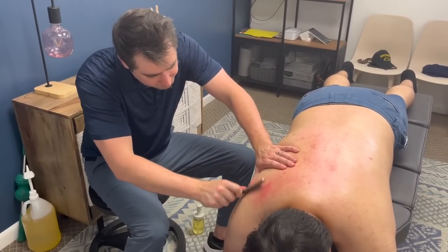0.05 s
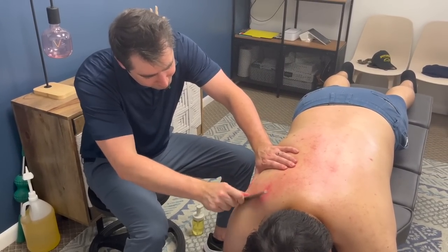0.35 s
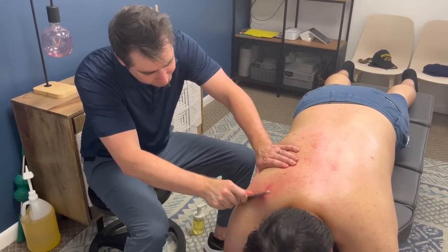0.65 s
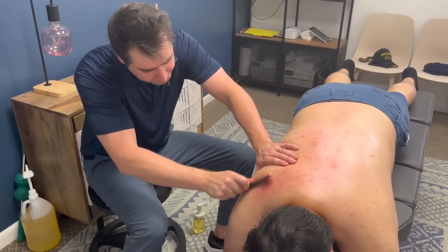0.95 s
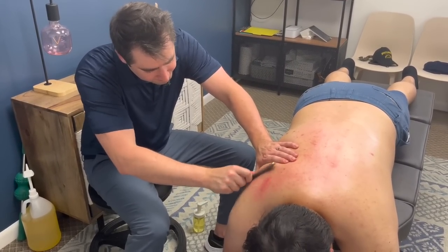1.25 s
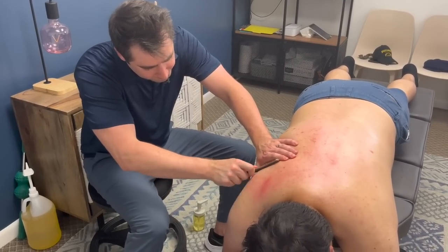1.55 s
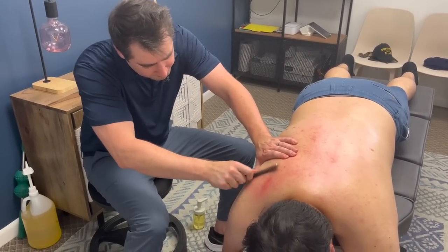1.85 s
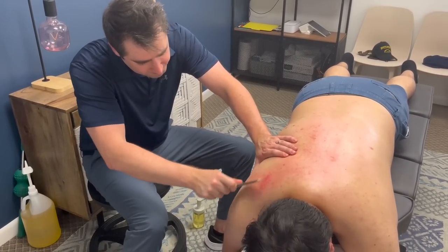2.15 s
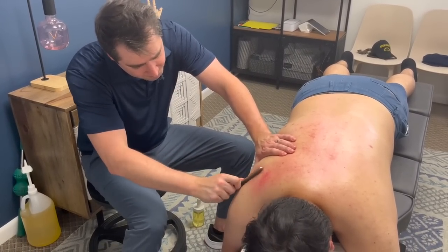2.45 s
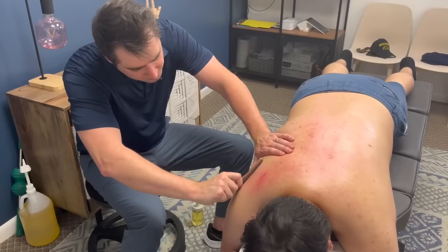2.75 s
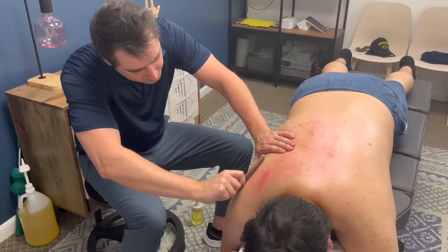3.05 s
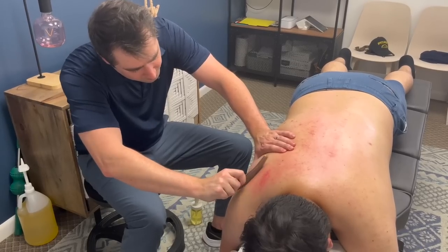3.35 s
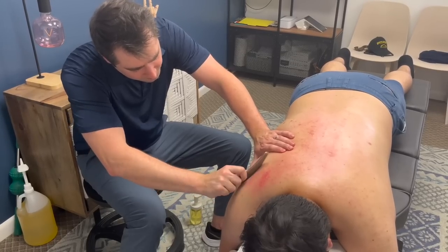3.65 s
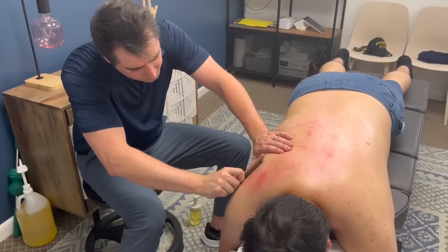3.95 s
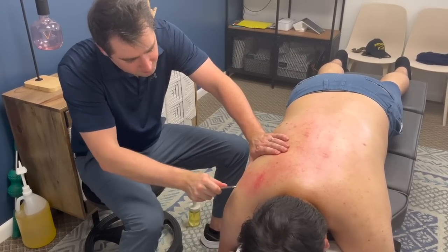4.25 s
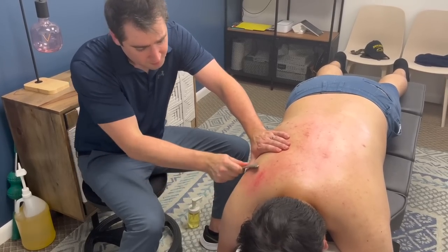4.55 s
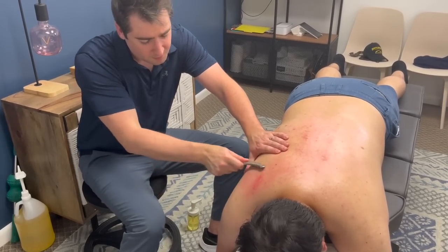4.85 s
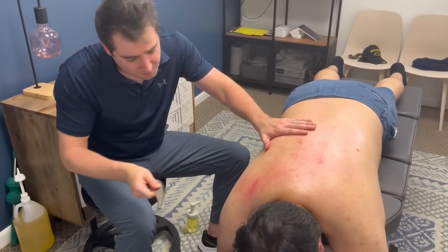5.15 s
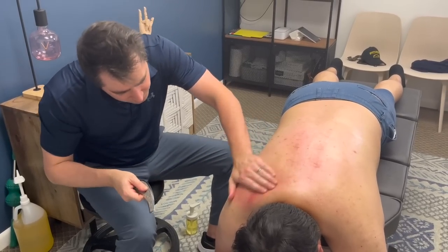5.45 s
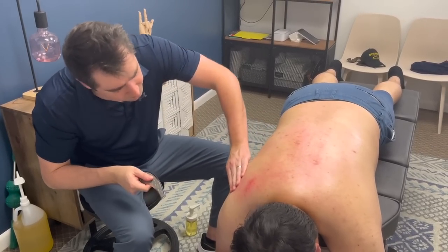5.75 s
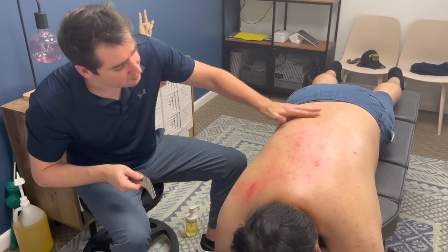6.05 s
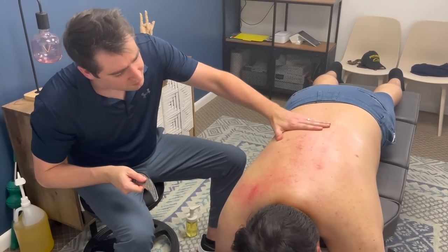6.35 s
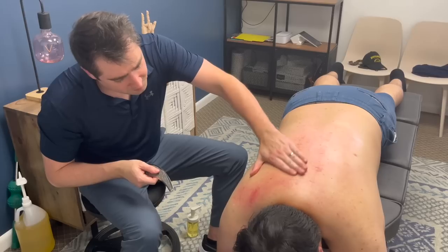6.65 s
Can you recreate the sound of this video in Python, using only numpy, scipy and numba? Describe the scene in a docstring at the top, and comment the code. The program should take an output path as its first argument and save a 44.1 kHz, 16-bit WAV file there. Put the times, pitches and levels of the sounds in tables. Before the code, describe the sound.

From the start, a steel scraper works softly over oiled skin at about four round trips a second, each push a grainy rasp, each return a brighter hiss, with a faint ring from the blade. Around 2 seconds the rhythm breaks, with a faint tick, then resumes from 2.7 to 3.9 seconds. A few slower strokes follow until 4.8 seconds, with a tool click at 4.3. Near 5 seconds comes a sharp metallic click with tiny finger squeaks and a rustle of clothes, then a softer tick. A palm slides over the back with a soft hiss from 5.1 to 5.7 seconds. The tool gives a quick, sharp cluster of clicks just before 6 seconds, and the palm slides again until about 6.7. Steady ventilation and a low electrical hum lie underneath throughout. The room is small, heard through a phone a metre or two away.

```python
"""In a small treatment room, a steel scraper rasps over oiled skin, about four round trips a second.
Skin grips and slips in many tiny jerks: the edge rasps, the flat face hisses and the blade rings.
Later the tool clicks and squeaks in the fingers, clothes rustle and the free palm slides over the back.
Ventilation and mains hum lie underneath; all is heard through a phone a metre or two away."""
import sys
import numpy as np
from scipy import signal
from scipy.fft import rfft, irfft
from scipy.io import wavfile
from scipy.ndimage import uniform_filter1d
from numba import njit

SR = 44100
rng = np.random.default_rng(int(sys.argv[2]) if len(sys.argv) > 2 else 0)


def file_out(sig):
    """Save sig as 16-bit WAV at sys.argv[1]."""
    # one column per channel
    cols = np.atleast_2d(sig).T
    # limit, then scale
    lim = np.clip(cols, -1, 1)
    pcm = np.round(lim * 32767).astype(np.int16)
    wavfile.write(sys.argv[1], SR, pcm)


N = 295029
T = np.arange(N) / SR
FREQS = np.maximum(np.fft.rfftfreq(N, 1 / SR), 1)

# Levels in the tables are relative: the functions add their own gains.
# pushes, edge first: (middle [s], length [s], rasp [dB], coarse bite [dB], blade ring [dB])
PUSH_STROKES = [(0.087, 0.099, -57.5, -58, -61), (0.344, 0.074, -57, -56, -57.5),
                (0.606, 0.077, -58, -63, -59), (0.859, 0.076, -54.5, -55, -55.5),
                (1.133, 0.076, -56, -57, -58), (1.383, 0.068, -58, -59.5, -67),
                (1.638, 0.071, -60, -61, -60), (1.894, 0.07, -59.5, -64, -63),
                (2.843, 0.077, -59.5, -63, -60), (3.102, 0.096, -59.5, -61, -61),
                (3.369, 0.082, -56, -65, -60), (3.627, 0.081, -57, -64, -61.5),
                (3.877, 0.16, -60.5, -73, -73), (4.66, 0.12, -56.5, -61.5, -64)]
# returns, flat face first: (middle [s], length [s], rasp [dB], hiss [dB], blade ring [dB])
RETURN_STROKES = [(0.212, 0.073, -56.5, -52.5, -66), (0.467, 0.078, -56.5, -51, -59.5),
                  (0.725, 0.076, -59, -54.5, -58.5), (0.988, 0.097, -55.5, -49, -59),
                  (1.255, 0.088, -56.5, -50.5, -61), (1.504, 0.077, -56, -50.5, -58.5),
                  (1.756, 0.067, -57.5, -50, -55.5), (2.004, 0.042, -55, -56.5, -70),
                  (2.431, 0.046, -58.5, -57.5, -65), (2.715, .06, -56, -55, -72),
                  (2.957, 0.072, -58, -51.5, -66), (3.22, 0.081, -58, -53.5, -65),
                  (3.491, 0.094, -58, -50, -56.5), (3.737, 0.073, -55, -51.5, -57.5),
                  (4.35, 0.097, -58, -56.5, -75), (4.502, .12, -61, -54, -70), (4.834, 0.13, -64, -67, -75)]
# tone colour of the dragging edge: (frequency [Hz], level [dB])
EDGE_COLOUR = [(300, -2.5), (900, -2), (1600, -10.5), (2100, -3.5), (2700, -4.5), (3300, -2), (3900, -0.5),
               (4600, -2), (5000, -3.5), (5400, -3.5), (6200, -9), (11500, -16.5)]
# tone colour of the gliding face: (frequency [Hz], level [dB])
FACE_COLOUR = [(500, -30), (2800, -22), (4400, -10.5), (5200, -12), (6200, -14), (7100, -4.5), (8200, -2),
               (9500, 0), (11000, 2), (12000, 0)]
# notes the blade rings at while it scrapes: (frequency [Hz], level [dB])
BLADE_NOTES = [(3340, 4), (4400, -7), (5380, -11)]
# the tool clicking in the hand: (time [s], ring [dB], dull knock [dB], treble limit [Hz], snap [dB])
TOOL_CLICKS = [(2.197, -63, -54, 6000, -70), (4.3283, -42, -37.5, 8000, -41), (4.3312, -45, -46, 7000, -55),
               (4.9572, -45, -50, 6000, -55), (4.9583, -35, -43, 5960, -21.5),
               (5.2012, -52, -43.5, 4000, -45), (5.9505, -40, -45, 9000, -44),
               (5.9555, -38.5, -47, 9000, -29), (5.9609, -32, -42.5, 9400, -38),
               (5.9643, -34, -49, 7000, -38)]
# notes of the tool, damped by the fingers: (frequency [Hz], level [dB], time to fade by 60 dB [s])
TOOL_NOTES = [(1120, -29, 0.01), (2250, -4, 0.003), (3380, 0.5, 0.0071), (4500, 1.5, 0.0078),
              (5670, -2.5, 0.0094), (6700, -8, 0.015), (8140, -21, 0.12), (9730, -3, 0.032)]
# tone colour of a knock on flesh: (frequency [Hz], level [dB])
KNOCK_COLOUR = [(150, -18), (450, 1.5), (750, -3), (1150, -1), (1600, -9), (2300, -5), (3500, -7),
                (9000, -42)]
# oily fingers squeaking on steel: (middle [s], length [s], pitch [Hz], glide [Hz/s], level [dB])
FINGER_SQUEAKS = [(4.823, .002, 4800, 0, -46.5), (4.953, .007, 4700, 0, -54),
                  (4.968, 0.014, 4930, 90000, -50), (4.982, 0.024, 7140, 30000, -55)]
# slides of the palm: (touches [s], lies flat [s], lifts [s], level [dB])
PALM_SLIDES = [(5.065, 5.287, 5.73, -52), (6.05, 6.52, 6.69, -50)]
# strength of the palm's hiss, one curve for each slide: (time [s], level [dB])
PALM_HISS_CURVES = [
    [(5.05, -74), (5.098, -66), (5.366, -47.5), (5.544, -55), (5.678, -48), (5.752, -71), (5.78, -69)],
    [(6.03, -65), (6.528, -59), (6.69, -59.5)],
]
# tone colour of the palm's hiss: (frequency [Hz], level [dB])
PALM_HISS_COLOUR = [(500, -30), (3000, -16), (5200, -7), (6200, -8), (7100, -3.5), (9500, 4.5), (11500, -6)]
# tone colour of the palm's rub: (frequency [Hz], level [dB])
PALM_RUB_COLOUR = [(150, -3), (320, 7.5), (700, 2), (1200, 2), (1800, 0.5), (3500, 3), (5500, -2.5),
                   (6500, -1), (11000, -10.5)]
# hollow rubs of a sleeve or cupped hand: (middle [s], length [s], pitch [Hz], level [dB])
HOLLOW_RUBS = [(4.25, 0.98, 2120, -68), (5.34, 0.092, 3000, -58), (5.693, 0.73, 2180, -57),
               (6.603, 0.17, 1190, -56.5), (6.62, 0.16, 3500, -65), (6.596, 0.43, 297, -55)]
# dull rustles of hands and clothes: (middle [s], length [s], level [dB])
RUSTLES = [(.01, 0.13, -54.5), (2.616, 0.18, -58), (3.91, 0.26, -60), (4.068, 0.1, -58.5),
           (4.37, 0.14, -60), (4.849, 0.055, -48.5), (4.908, 0.062, -53.5), (5.604, 0.97, -53)]
# tone colour of those rustles: (frequency [Hz], level [dB])
RUSTLE_COLOUR = [(150, 0), (400, 0.5), (1100, -1.5), (1700, -5), (2800, -7.5), (4500, -10), (7000, -15),
                 (11000, -12)]
# how far the left side runs ahead for sound from the table: (frequency [Hz], phase lead [rad])
LEFT_LEAD = [(100, 2), (2200, -0.25), (4500, 1), (6400, 0.85), (8100, 0.58), (9100, 2), (9900, 2.5),
             (11000, 3.5)]
# tone colour of the ventilation: (frequency [Hz], level [dB])
AIR_COLOUR = [(8, -61.5), (20, -56), (36, -57), (43, -49.5), (53, -61.5), (66, -64.5), (85, -65),
              (102, -72.5), (128, -67), (160, -79.5), (215, -75), (280, -78.5), (400, -83), (1000, -91.5),
              (2500, -98), (6000, -100.5), (7600, -101.5), (9800, -99.5), (11500, -102.5)]
# balance of the air noise, with more bass on the right: (frequency [Hz], left minus right [dB])
AIR_PAN = [(20, -3.5), (45, -2.5), (75, -1.5), (130, -1.5), (200, -0.5), (1000, 1), (6000, 0)]
# how alike the air noise is on the two sides: (frequency [Hz], correlation [-1 to 1])
AIR_SIMILARITY = [(30, 0.9), (100, 0.15), (200, 0.48), (600, 0.6), (1200, 0.17), (6000, 0.62),
                  (11000, -0.56)]
# tones of the mains and the fan: (frequency [Hz], left [dB], right [dB], phase lead of left [rad])
HUM_TONES = [(59.5, -44, -33, -2), (75, -59, -54.5, 0), (83.2, -65, -51, -0.9), (120, -66, -62, -1.2),
             (241, -66, -62.5, -0.5), (271.7, -66, -65, 0.6), (486, -70, -67, 1.5), (601, -79, -68.5, 0),
             (832, -72.5, -85, -0.35)]
# slow rise and fall of the hum: (time [s], level [dB])
HUM_CURVE = [(0.2, 1), (1.6, 0), (2.9, 0.5), (3.6, -1.5), (4.5, -1), (5.3, 4), (6.1, 1.7), (6.6, 0.7)]

TOP_HZ = 11850  # upper limit of the treble


def scraper():
    """The edge rasps on the skin and sets the blade ringing; the flat face adds a bright hiss."""
    tight_q, loose_q, loosen_s = 6.1, 15, 2.2  # a looser grip gives a purer ring (higher Q)
    drag, bite, glide, sing = strokes()
    slips = friction(slips_per_s=3000, spread_db=-1.0, grip_db=1.5, grip_hz=140)
    shift = 1 + 0.016 * wander(5.1)  # finger pressure bends the notes
    tight, loose = (
        unit(sum(undb(db) * resonance(slips, hz * shift, hz / q) for hz, db in BLADE_NOTES))
        for q in (tight_q, loose_q))
    ring = sing * np.where(T < loosen_s, tight, loose)
    # a hard push catches the skin in coarser, lower slips
    catches = friction(slips_per_s=1500, spread_db=1.0, grip_db=2.0, grip_hz=370)
    catches = resonance(catches, hz=2400 * (1 + 0.06 * wander(6.8)), width_hz=2400.0)
    grit = bite * unit(resonance(catches, hz=np.full(N, 2400.0), width_hz=2800.0))
    face_slips = friction(slips_per_s=13000, spread_db=0.0, grip_db=1.85, grip_hz=130)
    edge_slips = friction(slips_per_s=2200, spread_db=1.0, grip_db=1.5, grip_hz=140)
    hiss = colour(glide * face_slips, FACE_COLOUR)
    rasp = colour(drag * edge_slips, EDGE_COLOUR)
    return undb(1.0) * rasp + undb(1.5) * ring + undb(2.0) * grit + undb(4.0) * hiss


def strokes():
    """Each stroke's speed sets how much the edge drags and bites, the face glides and the blade sings."""
    drag, bite, glide, sing = np.zeros((4, N))
    for time, length, rasp_db, bite_db, ring_db in PUSH_STROKES:
        speed = swell(time, length, shape=3.4)
        drag += undb(rasp_db) * speed
        bite += undb(bite_db) * speed ** 2
        glide += undb(rasp_db - 0.5) * speed
        sing += undb(ring_db) * speed ** 2
    for time, length, rasp_db, hiss_db, ring_db in RETURN_STROKES:
        speed = swell(time, length, shape=2.7)
        drag += undb(rasp_db) * speed
        glide += undb(hiss_db) * speed
        sing += undb(ring_db) * speed ** 2
    return drag, bite, glide, sing


def clicks():
    """Steel snaps on a fingernail, cracks, rings until the fingers stop it and knocks dully on flesh."""
    snap_rise_s, thud_rise_s = 0.000035, 0.00019
    bright, dull = np.zeros((2, N))
    t = T[:SR // 10]
    for time, ring_db, knock_db, treble_hz, snap_db in TOOL_CLICKS:
        span = slice(int(time * SR), int(time * SR) + len(t))
        crack = rng.standard_normal(len(t)) * np.exp(-t / 0.0026)
        knock = rng.standard_normal(len(t)) * np.exp(-t / 0.0036)
        detune = 1 + 0.012 * rng.standard_normal(len(TOOL_NOTES))
        ring = sum((-1) ** k * undb(db - 60 * t / fade_s) * np.sin(2 * np.pi * hz * detune[k] * t)
                   for k, (hz, db, fade_s) in enumerate(TOOL_NOTES))
        soften = signal.butter(4, treble_hz, fs=SR)
        snap = t / snap_rise_s * np.exp(1 - t / snap_rise_s)
        thud = t / thud_rise_s * np.exp(1 - t / thud_rise_s)
        bright[span] += undb(ring_db) * signal.lfilter(*soften, undb(-2.0) * ring + undb(0.5) * crack)
        bright[span] += undb(snap_db) * snap
        dull[span] += undb(knock_db) * (thud / 2 + undb(-2.5) * knock)
    return bright + colour(dull, KNOCK_COLOUR)


def squeaks():
    """A fingertip sticks and slips for an instant; the longer squeaks rise in pitch as it slides off."""
    out = np.zeros(N)
    for time, length, hz, glide, db in FINGER_SQUEAKS:
        pitch = hz + glide * np.clip(T - time, -length, length)
        tone = unit(resonance(rng.standard_normal(N), pitch, width_hz=670.0))
        out += undb(db) * swell(time, length, shape=1.1) * unit(np.tanh(tone))
    return out


def palm():
    """The soft hand presses in, eases off and lifts: a low rub, a hiss and a swish that falls in pitch."""
    touch_db, ease_db_per_s = -12.5, -14.5  # light first touch; easing off once flat
    fade_s, flatten_s = 0.036, 0.094
    rub, sweep, flatness, treble = np.zeros((4, N))
    for touch, flat, lift, db in PALM_SLIDES:
        contact = np.clip(np.minimum(T - touch, lift - T) / fade_s + .5, 0, 1)
        pressure_db = np.interp(T, [touch, flat], [touch_db, 0]) + ease_db_per_s * np.maximum(T - flat, 0)
        rub += contact * undb(db + pressure_db)
        sweep += undb(db) * swell(flat - 0.033, length_s=0.21, shape=1.3)  # peaks just before lying flat
        flatness += contact * np.clip((T - flat) / flatten_s + .5, 0, 1)
    for curve in PALM_HISS_CURVES:
        treble += undb(np.interp(T, *np.transpose(curve), left=-120, right=-120))
    rub_slips = friction(slips_per_s=12000, spread_db=0.0, grip_db=-1.5, grip_hz=62)
    swish_slips = friction(slips_per_s=3700, spread_db=-5.0, grip_db=0.0, grip_hz=100)
    hiss_slips = friction(slips_per_s=25000, spread_db=2.0, grip_db=1.5, grip_hz=71)
    swish_hz = np.interp(flatness, [0, 1], [4470, 3630])
    swish = sweep * steep_band(swish_slips, swish_hz, width_hz=2400.0)
    hiss = colour(treble * hiss_slips, PALM_HISS_COLOUR)
    return undb(1.5) * colour(rub * rub_slips, PALM_RUB_COLOUR) + undb(-2.5) * swish + undb(1.5) * hiss


def hollow_rubs():
    """A sleeve or cupped hand rubs softly, with a hollow pitch that wanders as the hand moves."""
    out = np.zeros(N)
    for time, length, hz, db in HOLLOW_RUBS:
        slips = friction(slips_per_s=2500, spread_db=0.0, grip_db=1.5, grip_hz=56)
        pitch = hz * (1 + 0.015 * wander(14))
        out += undb(db) * swell(time, length, shape=19.0) * steep_band(slips, pitch, width_hz=0.35 * hz)
    return out


def rustles():
    """Hands change their grip and clothes shift with a coarse, dull rustle."""
    speed = sum(undb(db) * swell(time, length, shape=1.6) for time, length, db in RUSTLES)
    slips = friction(slips_per_s=9000, spread_db=-2.5, grip_db=1.6, grip_hz=120)
    return colour(speed * slips, RUSTLE_COLOUR)


def room(x, fade_s, echo_db, left_db):
    """Sound arrives directly, then as a short, duller echo off walls and furniture, different each side."""
    turn = np.exp(.5j * across(LEFT_LEAD))
    pan = undb(left_db / 2)
    direct = irfft(rfft(x) * np.array([turn * pan, turn.conj() / pan]), N)
    t = T[:SR // 2]
    tail = rng.standard_normal((2, len(t))) * undb(-60 * t / fade_s) * (t > .003)
    tail /= np.sqrt(np.sum(tail ** 2, axis=1, keepdims=True))
    tail = signal.lfilter(*signal.butter(4, 9300, fs=SR), tail)
    echo = signal.fftconvolve(x[None], tail, axes=1)[:, :N]
    return undb(0.18) * direct + undb(echo_db) * echo


def ventilation():
    """Moving air makes a steady rush and rumbles at the room's own low notes."""
    alike = across(AIR_SIMILARITY)
    shared, opposed = (rfft(colour(rng.standard_normal(N), AIR_COLOUR)) for _ in range(2))
    sides = np.array([[1], [-1]])
    stereo = shared * np.sqrt((1 + alike) / 2) + sides * opposed * np.sqrt((1 - alike) / 2)
    return undb(-38) * irfft(stereo * undb(sides * across(AIR_PAN) / 2), N)


def hum():
    """The mains and the fan give low tones that waver a little."""
    out = np.zeros((2, N))
    for hz, left_db, right_db, lead in HUM_TONES:
        phase = 2 * np.pi * (hz * T + rng.random()) + 0.039 * wander(1.5)
        tone = np.array([undb(left_db) * np.sin(phase + lead), undb(right_db) * np.sin(phase)])
        out += np.sqrt(2) * undb(0.27 * wander(2.26)) * tone
    return out * undb(np.interp(T, *np.transpose(HUM_CURVE)))


def friction(slips_per_s, spread_db, grip_db, grip_hz):
    """Rubbing is a crowd of tiny slips of uneven size, bunched by the changing grip of the skin."""
    slips = (rng.random(N) < slips_per_s / SR) * rng.standard_normal(N)
    return unit(slips * undb(spread_db * rng.standard_normal(N) + grip_db * wander(grip_hz)))


def swell(middle_s, length_s, shape):
    """A rise and fall, above half height for length_s; a larger shape gives a flatter top."""
    return 2 ** -np.minimum(np.abs(2 * (T - middle_s) / length_s) ** shape, 60)


def wander(per_s):
    """A smooth random curve of size about 1, with per_s new values a second."""
    hold = int(SR / per_s)
    steps = np.repeat(rng.standard_normal(N // hold + 1), hold)
    return unit(uniform_filter1d(uniform_filter1d(steps, hold), hold)[:N])


@njit
def resonance(x, hz, width_hz):
    """A band-pass filter: it lets through the sound near a pitch that may move."""
    out, band_state, low_state = np.empty(len(x)), 0., 0.
    for i in range(len(x)):
        step, damping = np.tan(np.pi * hz[i] / SR), width_hz / hz[i]
        band = (band_state + step * (x[i] - low_state)) / (1 + step * (step + damping))
        band_state = 2 * band - band_state
        low_state += 2 * step * band
        out[i] = damping * band
    return out


def steep_band(x, hz, width_hz):
    """The same resonance twice for steeper sides, scaled to a strength of 1."""
    return unit(resonance(resonance(x, hz, width_hz), hz, width_hz))


def colour(x, points):
    """Give white noise a tone colour and keep its power."""
    return irfft(rfft(x) * unit(undb(across(points)) * (FREQS < TOP_HZ)), N)


def across(points):
    """Join (frequency, value) points into a curve, giving each octave equal room."""
    hz, value = np.transpose(points)
    return np.interp(np.log(FREQS), np.log(hz), value)


def undb(db):
    """Turn decibels into a gain."""
    return 10 ** (np.asarray(db) / 20)


def unit(x):
    """Scale to an average strength (rms) of 1."""
    return x / np.sqrt(np.mean(x ** 2))


def scene():
    """Work at the table, heard in the room over its steady background."""
    rubbing = room(scraper() + palm() + hollow_rubs() + rustles(), fade_s=0.11, echo_db=-7.5, left_db=1.34)
    ticking = room(clicks() + squeaks(), fade_s=0.17, echo_db=-2.0, left_db=4.0)
    return rubbing + ticking + ventilation() + hum()


def record(dry):
    """The phone cuts off the highest treble."""
    return signal.sosfilt(signal.ellip(10, .2, 80, TOP_HZ, fs=SR, output="sos"), dry)


dry = scene()
out = record(dry)
file_out(out)
```